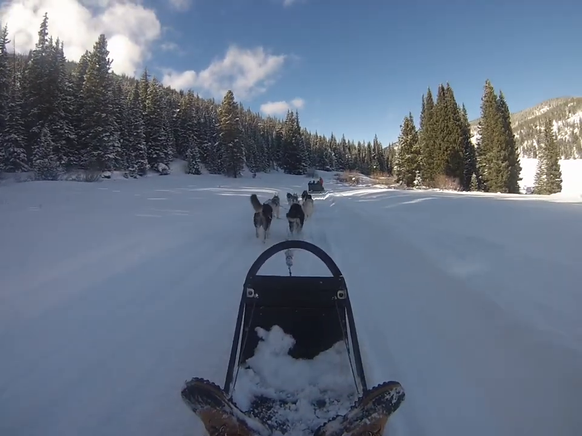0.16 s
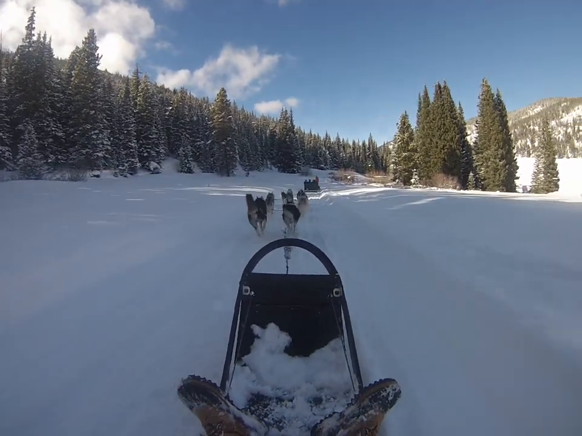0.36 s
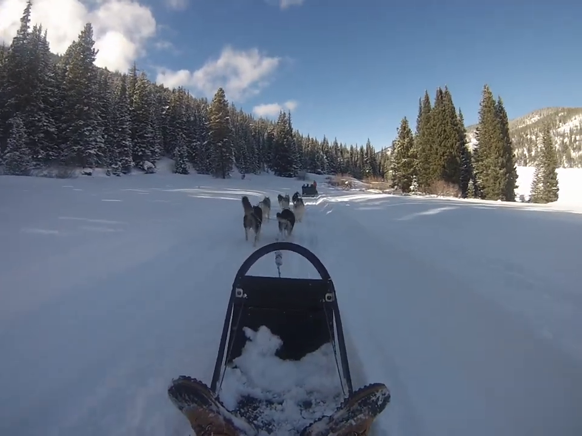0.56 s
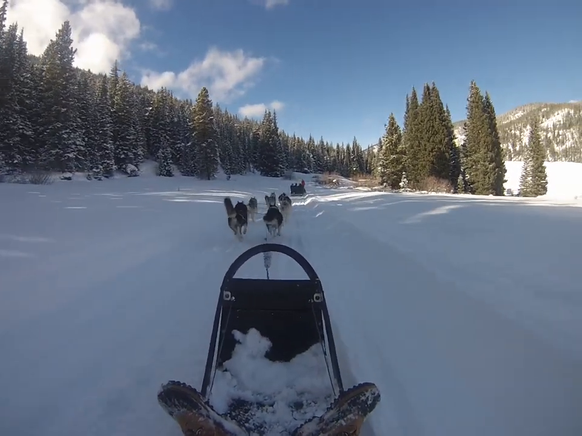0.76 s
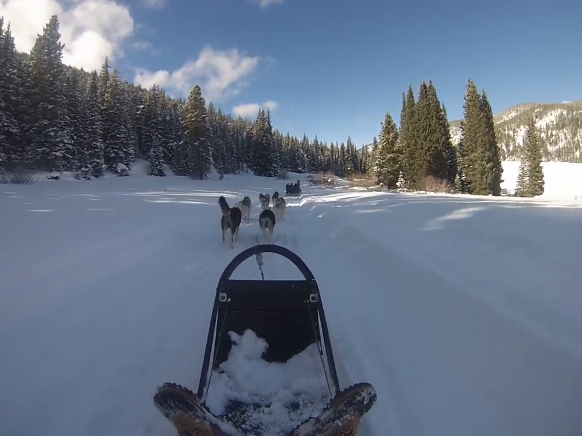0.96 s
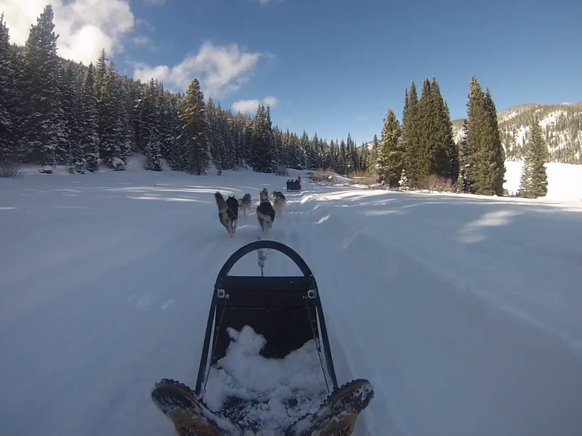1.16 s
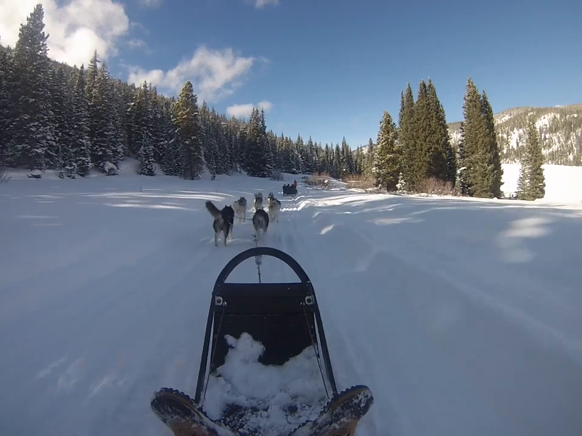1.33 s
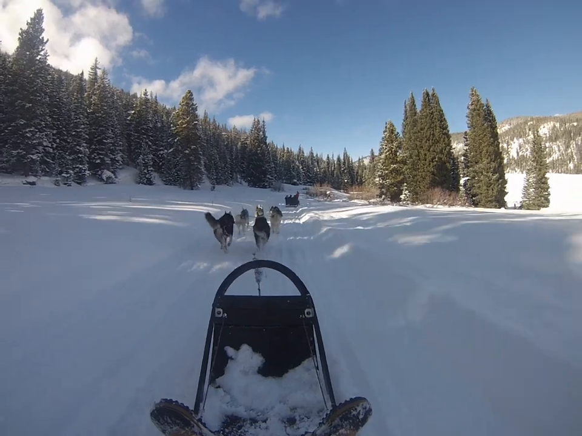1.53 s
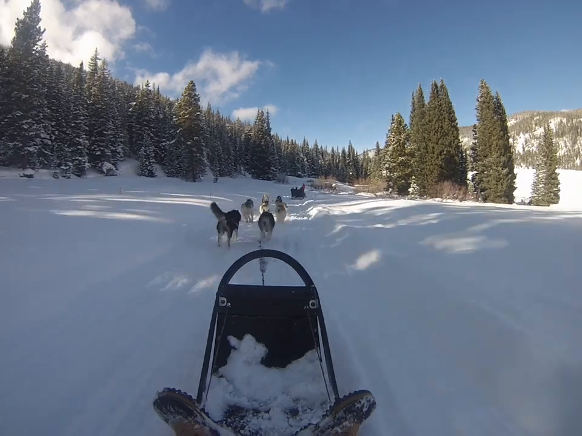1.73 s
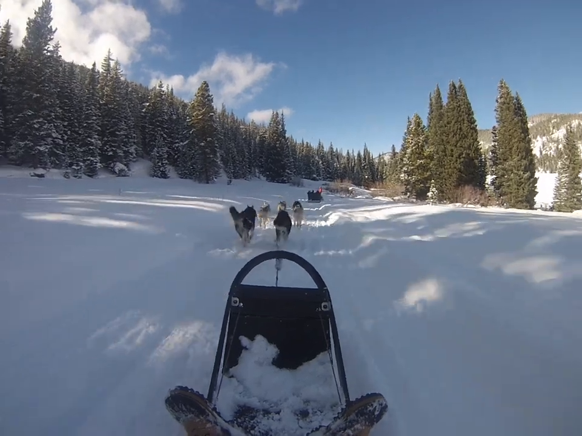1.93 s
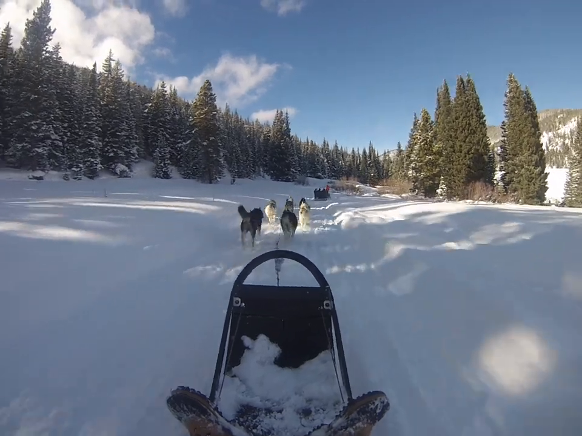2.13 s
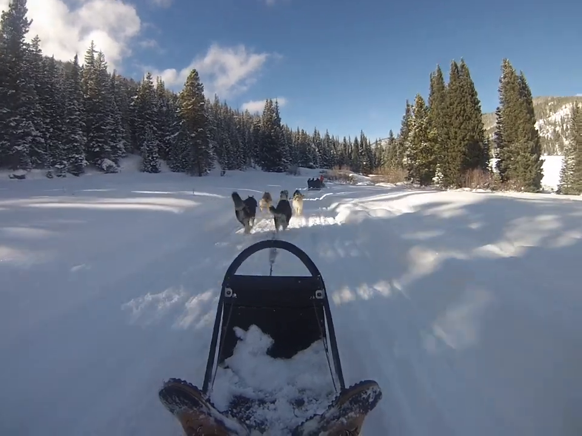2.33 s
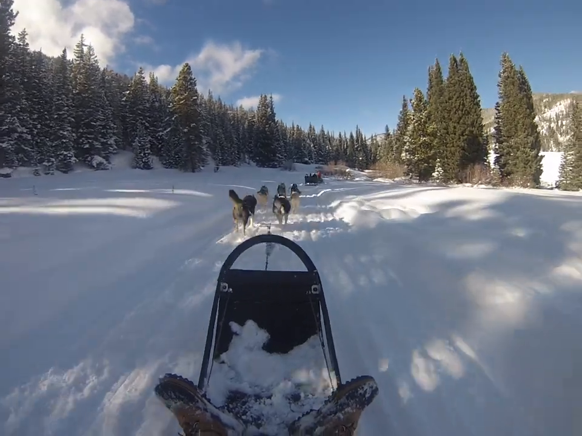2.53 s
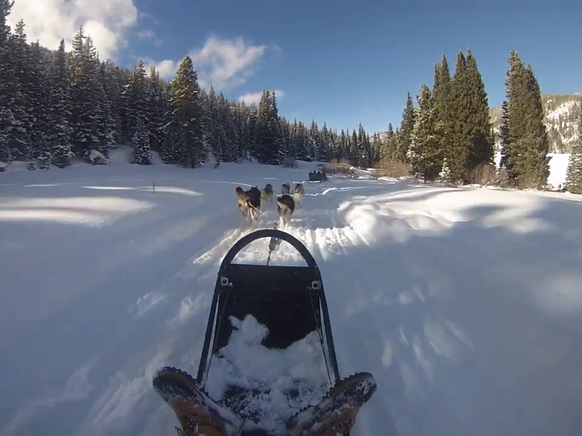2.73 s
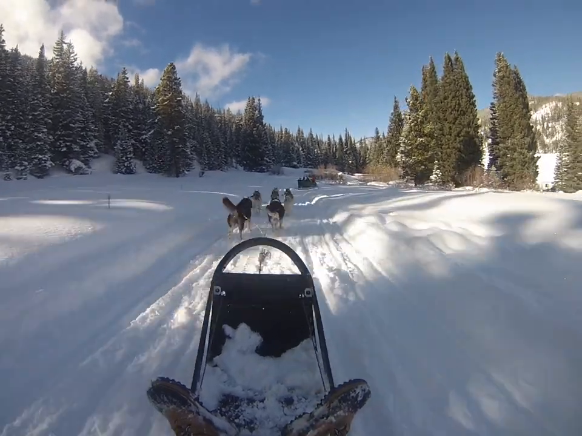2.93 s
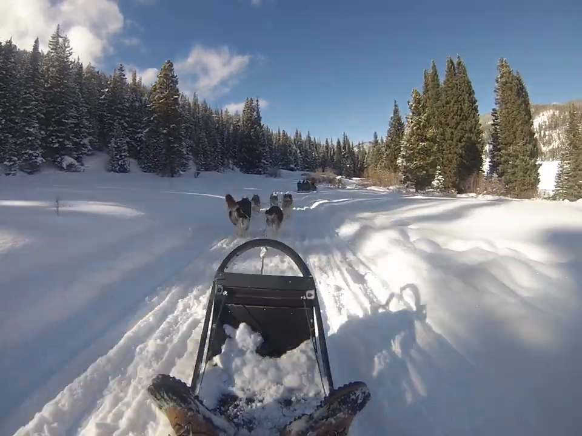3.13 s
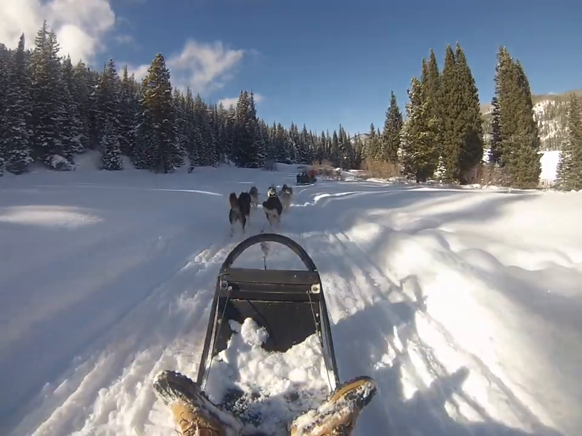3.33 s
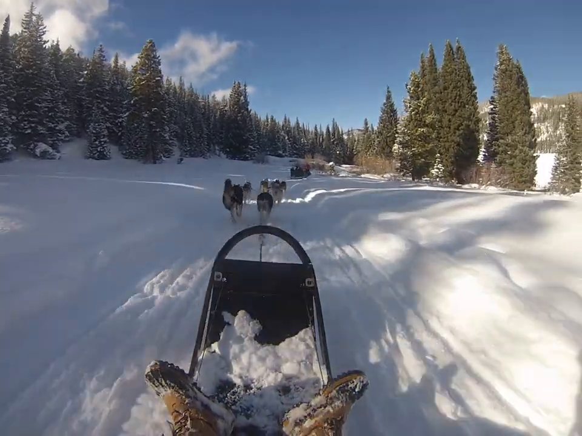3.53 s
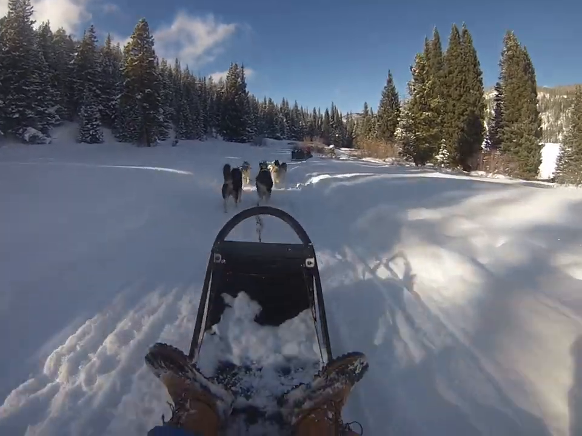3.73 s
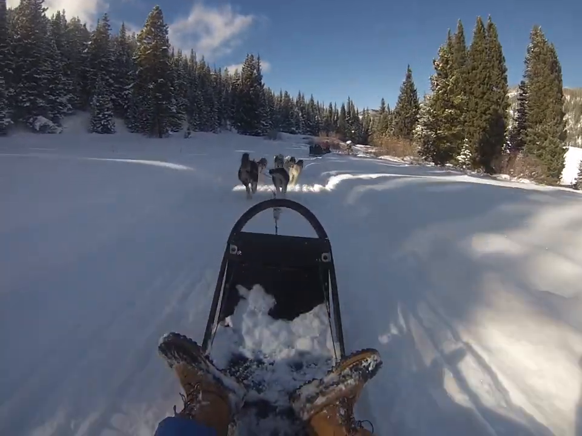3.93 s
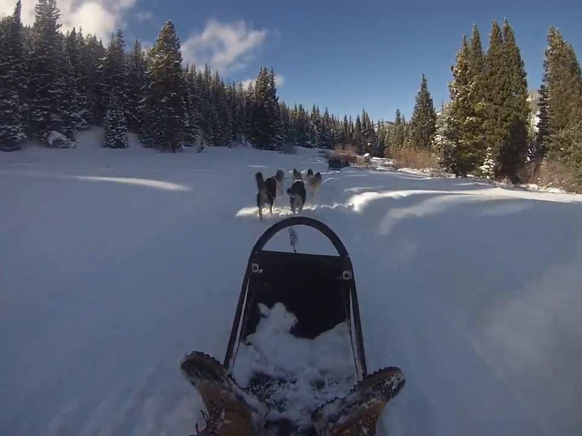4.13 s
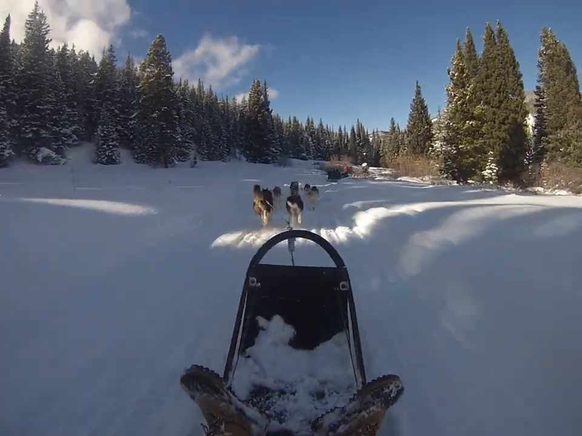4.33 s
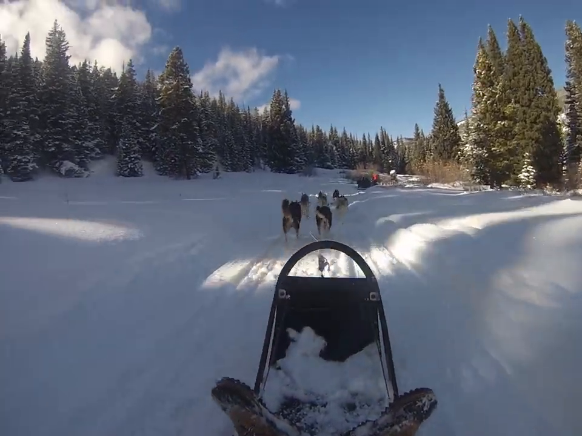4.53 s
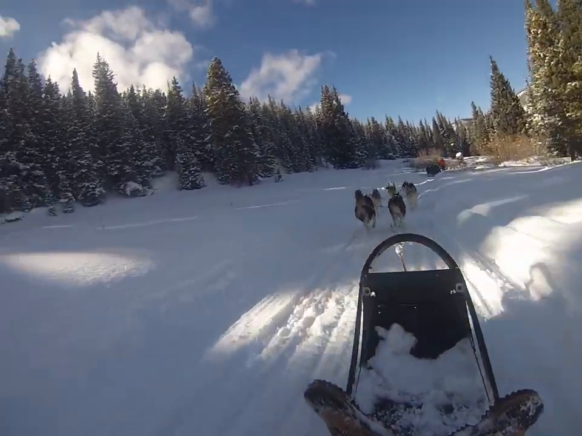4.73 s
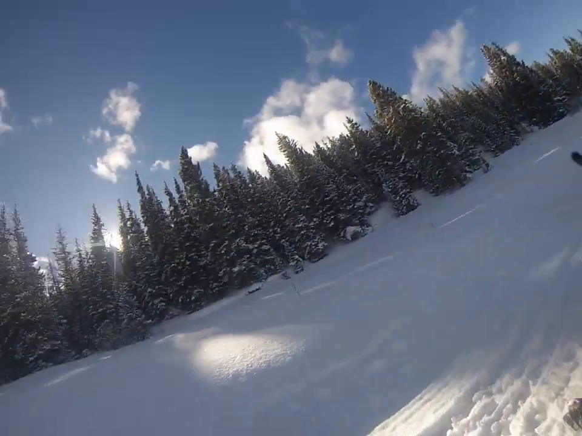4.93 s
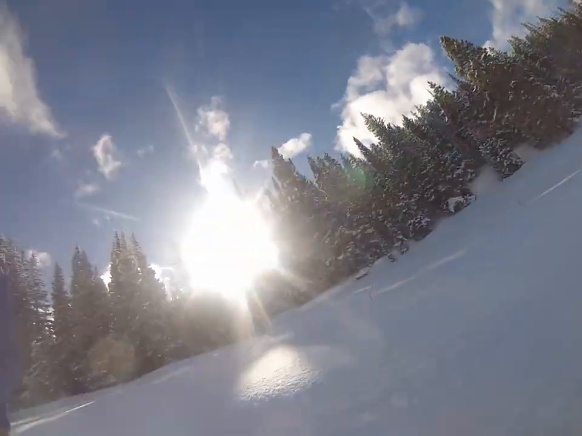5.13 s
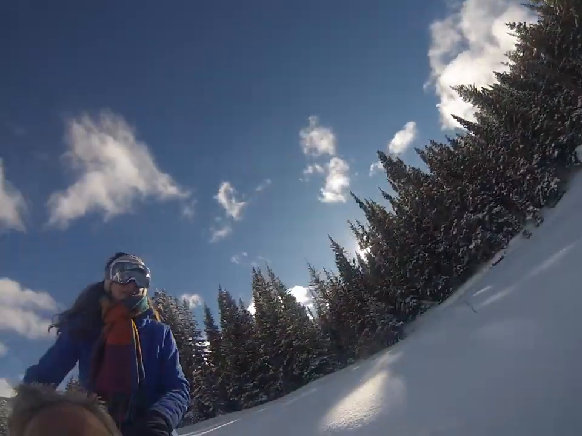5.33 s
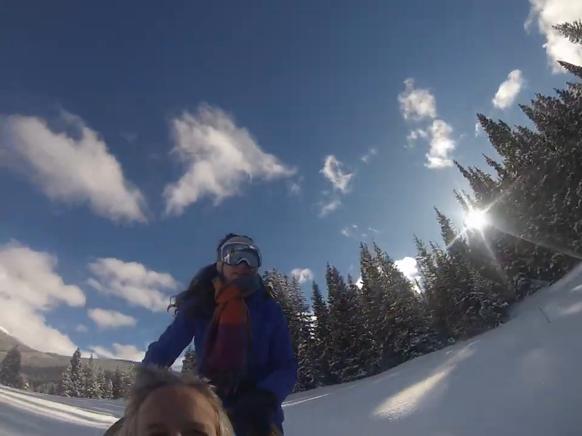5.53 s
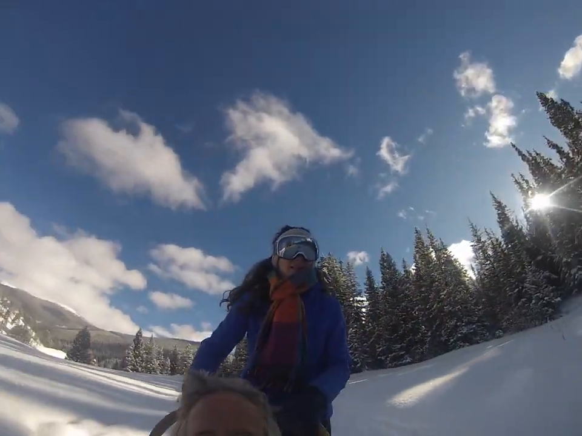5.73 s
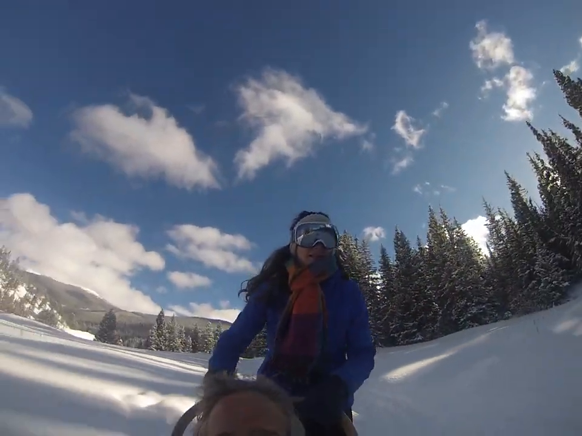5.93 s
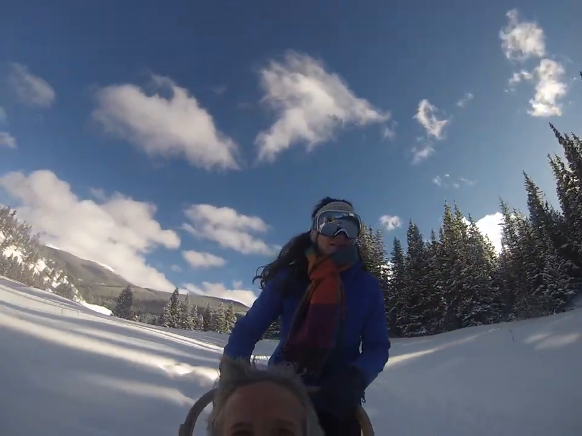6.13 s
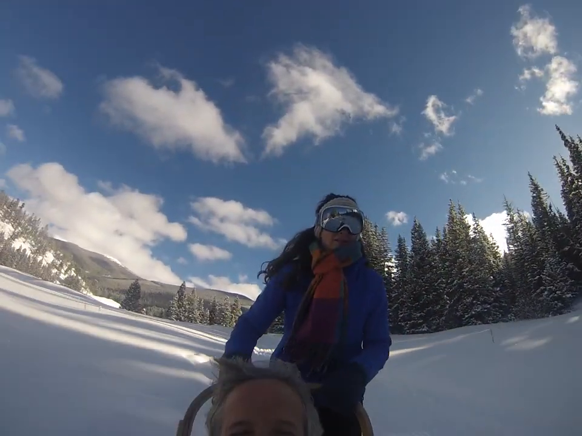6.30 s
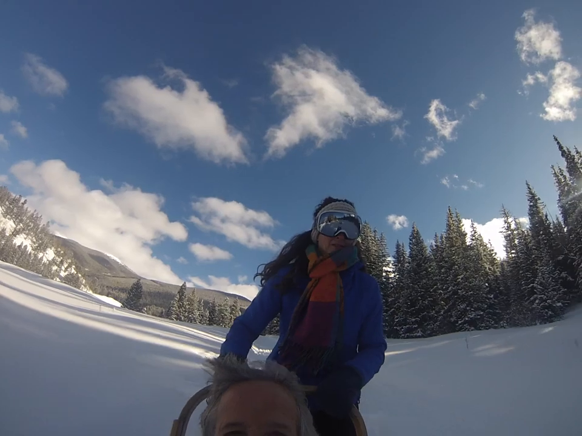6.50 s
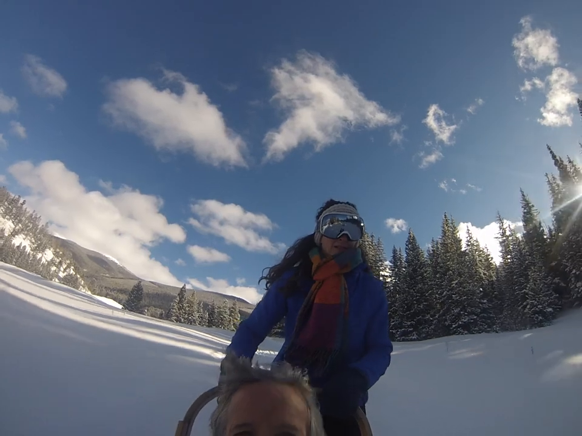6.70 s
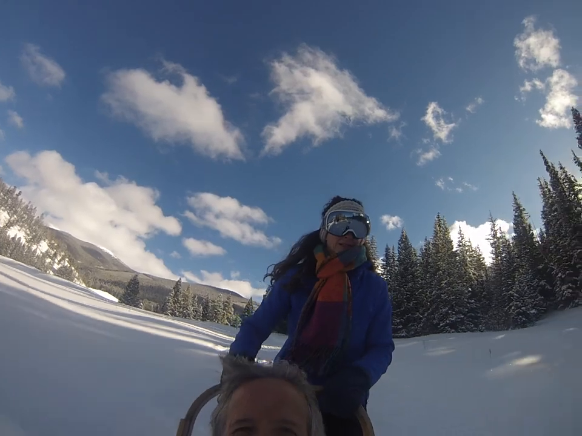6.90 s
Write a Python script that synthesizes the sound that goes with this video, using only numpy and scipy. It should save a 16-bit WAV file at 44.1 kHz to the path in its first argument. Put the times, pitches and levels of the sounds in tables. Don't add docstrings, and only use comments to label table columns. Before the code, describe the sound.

Heard from inside a small sealed camera case on a sled: continuous hollow scrape and low rumble of runners on packed snow, with crunchy lumps, soft thuds and faint ticks. Near five seconds a gloved hand grabs the pole, bringing a heavy low thump, cloth rubbing, sharp knocks and a brief creak around six seconds. Then quieter sliding resumes over a faint electronic hiss.

```python
import sys
import numpy as np
from scipy import signal
from scipy.fft import rfft, irfft
from scipy.io import wavfile
from scipy.ndimage import uniform_filter1d

SR = 44100
rng = np.random.default_rng(int(sys.argv[2]) if len(sys.argv) > 2 else 0)


def level_to_linear(level):
    exponent = np.asarray(level, float) / 20
    return 10 ** exponent


def wrap_up_sound(samples):
    columns = np.atleast_2d(samples).T
    tamed = np.clip(columns, -1, 1)
    steps = np.round(tamed * 32767).astype(np.int16)
    wavfile.write(sys.argv[1], SR, steps)


N = 306936

# time_s, scrape_db, brightness_db
RUNNERS = [(0, -53, -1), (.13, -56.5, 4), (.5, -56.5, 1), (.75, -58, -2.5), (.95, -53, -3),
           (1.3, -55.5, -0.5), (1.55, -57.5, -2), (1.75, -55, 1), (2.1, -56, -0.5), (2.4, -56, -3),
           (2.8, -56, -1), (3.15, -57.5, -1), (3.4, -56, 2), (3.8, -58, 1), (4.6, -56.5, 0),
           (5.85, -57.5, 2.5), (6.1, -60, 0.5), (6.96, -58, -1)]
# time_s, share_done (0-1)
TURN = [
    (4.6, 0.17),
    (4.9, 0.53),
    (5.35, 0.65),
    (5.7, 0.83),
    (6.05, 0.88),
]


def curve(rows):
    s, *columns = np.transpose(rows)
    return [np.interp(np.arange(N) / SR, s, c) for c in columns]


def turned_share():
    return curve(TURN)[0]


def evened(x):
    return x / np.sqrt(np.mean(x ** 2) + 1e-20)


def coloured(x, points):
    f, db = np.transpose(points)
    hz = np.fft.rfftfreq(N, 1 / SR)
    gain_db = np.interp(np.log(hz + 1), np.log(f + 1), db, -120, -120)
    return evened(irfft(rfft(x) * level_to_linear(gain_db), N))


def band(x, lo_hz, hi_hz):
    return evened(signal.sosfilt(signal.butter(3, [lo_hz, hi_hz], "band", fs=SR, output="sos"), x))


def steadied(x, span_s, share):
    power = uniform_filter1d(x ** 2, int(span_s * SR)) + 0.0012
    return evened(x / power ** (share / 2))


def modes(x, table):
    rung = np.zeros(len(x))
    for k, (hz, width, db) in enumerate(table):
        rung += (-1) ** k * level_to_linear(db) * signal.lfilter(*signal.iirpeak(hz, hz / width, SR), x)
    return evened(signal.lfilter(*signal.butter(4, 1.15 * table[-1][0], fs=SR), rung))


def drift(span_s):
    size = int(span_s * SR)
    return evened(uniform_filter1d(uniform_filter1d(rng.standard_normal(N), size), size))


def swell(s, db, half_s):
    t = np.arange(N // 32 + 1) * 32 / SR
    return level_to_linear(np.maximum(db - 5 * ((t - s) / half_s) ** 2, -150))


def swells(rows):
    total = sum(swell(*row[:3]) for row in rows)
    return np.interp(np.arange(N), np.arange(N // 32 + 1) * 32, total)


def struck(peak_db, rise, t60):
    t = np.arange(SR // 2) / SR
    since_peak = np.hypot(np.maximum(t - rise, 0), rise / 2) - rise / 2
    decay = level_to_linear(peak_db - 60 * since_peak / t60)
    return t, decay * np.sin(np.pi / 2 * np.minimum(t / rise, 1)) ** 2


def add(mix, s, sound):
    part = mix[round(s * SR):][:len(sound)]
    part += sound[:len(part)]


def grit(per_s, spread_db, share, lumpy_db):
    size = level_to_linear(spread_db * np.minimum(rng.exponential(1, N), 3)) * np.sign(rng.standard_normal(N))
    clicks = evened(size * (rng.random(N) < per_s / SR))
    fine = rng.standard_normal(N)
    return (share * clicks + fine) * level_to_linear(lumpy_db * drift(0.033))


def pole():
    # centre_s, level_db, half_length_s
    lurches = [(0.11, -38, 0.034), (0.243, -35, 0.06), (0.519, -32, 0.077), (1.011, -44.5, 0.13),
               (1.193, -53, 0.07), (1.429, -40.5, 0.15), (2.085, -31.5, 0.026), (2.294, -40.5, 0.045),
               (2.525, -42.5, 0.16), (2.84, -34.5, 0.1), (3.327, -37, 0.071), (3.687, -46.5, 0.1),
               (3.828, -40.5, 0.087), (4.019, -38.5, 0.057), (4.246, -36.5, 0.058), (4.441, -37.5, 0.029),
               (4.7, -34.5, 0.12), (4.939, -26.5, 0.12), (5.214, -28.5, 0.059), (5.46, -27.5, 0.13),
               (5.703, -31, 0.024), (5.801, -30.5, 0.16), (6.127, -29.5, 0.071), (6.622, -37.5, 0.085),
               (6.95, -36, 0.033)]
    # frequency_hz, level_db (per Hz)
    free_colour = [(3, -59), (6, 12.5), (16, 6.5), (29, 2), (37, -33)]
    held_colour = [(3, -58), (6, 13), (14, 8), (24, -8), (34, -12), (45, -44)]
    # centre_s, level_db, half_length_s
    trail_bumps = [(0.102, -43.5, 0.014), (0.197, -45.5, 0.026), (0.567, -55, 0.039), (0.775, -47.5, 0.026),
                   (0.968, -47, 0.049), (1.074, -44, 0.025), (1.167, -45.5, 0.027), (1.288, -45, 0.016),
                   (1.377, -43.5, 0.028), (1.484, -52, 0.033), (1.692, -47, 0.05), (1.947, -53, 0.023),
                   (2.096, -46.5, 0.023), (2.251, -53, 0.036), (2.408, -47, 0.032), (2.572, -40, 0.028),
                   (2.692, -52, 0.031), (2.779, -43, 0.036), (2.898, -42, 0.032), (3.031, -53, 0.032),
                   (3.124, -52, 0.013), (3.194, -48, 0.023), (3.363, -50, 0.068), (3.58, -41.5, 0.041),
                   (3.675, -46, 0.038), (3.833, -45, 0.035), (3.958, -45.5, 0.035), (4.191, -37.5, 0.02),
                   (4.317, -49, 0.084), (4.52, -55, 0.085)]
    grabs = [(4.618, -43.5, 0.025), (4.696, -38, 0.023), (4.92, -21, 0.039), (5.07, -43, 0.051),
             (5.424, -34, 0.051), (5.66, -33, 0.068), (5.955, -36.5, 0.06), (6.095, -36.5, 0.032),
             (6.308, -44.5, 0.031), (6.415, -48.5, 0.054), (6.5, -49.5, 0.02), (6.704, -44.5, 0.042),
             (6.85, -51.5, 0.024)]
    # start_s, peak_db, rise_s, t60_s
    kicks = [
        (4.889, -16, .025, .07),
    ]
    # start_s, peak_db, pitch_hz, rise_s, t60_s
    jolts = [(4.893, -20, 56, .022, .13), (4.8, -34, 45, .02, .25), (5.174, -16, 37, .006, .22),
             (5.178, -19, 78, .012, .22), (5.375, -23, 27, .01, .2), (6.265, -35, 60, .008, .15),
             (4.19, -35, 60, .008, .15), (4.73, -33, 48, .02, .2), (.085, -37, 42, .01, .15),
             (.545, -33, 38, .01, .2), (.81, -36, 40, .008, .15), (3.98, -34, 42, .012, .2),
             (2.42, -36, 45, .012, .2), (5.1735, -38, 340, .002, .035), (5.719, -41, 340, .003, .05)]
    sway_rest_db, shudder_rest_db, hum_rest_db = -46, -52, -59.5
    shudder_under_bump_db, shudder_top_db, shudder_held_db = -7.5, -48.5, -2
    hum_hz, hum_spread_hz, hum_top_db = 83.9, 2.29, -27

    lurching, held = rng.standard_normal(N), turned_share() ** 2
    sway = (1 - held) * coloured(lurching, free_colour) + held * coloured(lurching, held_colour)
    sway = steadied(sway, 0.19, 0.67)
    shudder = steadied(band(rng.standard_normal(N), 25.8, 71.8), 0.031, 1.0)
    bumps = swells(trail_bumps + grabs)
    shaken = level_to_linear(shudder_rest_db) + np.minimum(level_to_linear(shudder_under_bump_db) * bumps, level_to_linear(shudder_top_db))
    out = np.hypot(level_to_linear(sway_rest_db), swells(lurches)) * sway
    out += shaken * level_to_linear(shudder_held_db * held) * shudder

    hum = np.minimum(np.hypot(level_to_linear(hum_rest_db), bumps), level_to_linear(hum_top_db))
    swing = np.sqrt(2) * hum * level_to_linear(1.5 * drift(0.024))
    for s, *blow in kicks:
        add(swing, s, struck(*blow)[1])
    wander_hz = 3.5 * drift(.012) + hum_spread_hz * drift(.08)
    wander_hz *= np.minimum(.008 / swing, 1)
    turns = np.cumsum(hum_hz + wander_hz) / SR
    out += swing * np.sin(2 * np.pi * (turns - turns[round(kicks[0][0] * SR)]))

    for s, peak_db, hz, rise, t60 in jolts:
        t, envelope = struck(peak_db, rise, t60)
        add(out, s, envelope * np.sin(2 * np.pi * hz * t))
    return out


def housing(x):
    # frequency_hz, width_hz, level_db
    shell_modes = [(1657, 255, -11.5), (1843, 64, 0), (2036, 122, -9), (2381, 69, -4.5), (2591, 89, -8),
                   (2830, 108, -6.5), (3342, 115, -13), (3590, 78, -18.5), (3732, 88, -16),
                   (4700, 290, -22.5)]
    # frequency_hz, width_hz, depth (0-1)
    hollows = [(1952, 33, 0.6), (2500, 57, 0.5), (3090, 200, .4), (3480, 76, 0.2)]
    rung = modes(x, shell_modes)
    for hz, width, depth in hollows:
        rung = rung - depth * signal.lfilter(*signal.iirpeak(hz, hz / width, SR), rung)
    return evened(rung)


def runners():
    # frequency_hz, level_db (per Hz)
    rumble_colour = [(62, -18), (105, 0.5), (113, -5.5), (162, -8), (199, -2.5), (274, -13), (313, -7.5),
                     (397, -13), (438, -11.5), (560, -24), (730, -52), (1230, -120)]
    # frequency_hz, width_hz, level_db
    crunch_modes = [(696, 127, -0.5), (991, 86, 2.5), (1278, 290, -2.5), (1640, 230, -13.5)]
    # frequency_hz, width_hz, level_db
    turned_modes = [(1572, 58, -1.5), (1755, 148, 4.5), (1900, 242, 3), (2140, 440, -4), (2770, 390, -17.5),
                    (2960, 75, -17), (3590, 280, -14), (4270, 380, -18), (5040, 470, -20)]
    # centre_s, rumble_db, half_length_s
    rut_rows = [(.05, -55.5, 0.041), (.8, -53, 0.085), (1.12, -57.5, 0.11), (1.38, -54, 0.078),
                (2.23, -56, 0.025), (2.95, -58, 0.046), (2.52, -61, 0.054), (3.55, -64.5, 0.1),
                (3.3, -56, 0.062), (4.61, -55.5, 0.1), (4.8, -56.5, 0.063), (5.31, -52, 0.02),
                (5.63, -54.5, 0.031), (5.99, -51.5, 0.092), (6.42, -73, 0.092)]
    # centre_s, ring_db, half_length_s, crunch_above_ring_db
    scuff_rows = [
        (4.79, -53.5, 0.13, -4.5),
        (5.224, -54.5, 0.03, -7),
        (5.035, -62, 0.072, 0.5),
        (5.296, -49, 0.019, -11),
        (5.408, -53.5, 0.016, 2.5),
        (5.466, -56, .09, 0.5),
        (5.666, -52, 0.011, 4),
        (5.686, -55.5, 0.062, 1),
        (5.824, -59.5, 0.051, 1),
        (6, -57.5, 0.039, -4),
    ]
    rumble_db, rumble_follows, crunch_db, crunch_follows = -55.5, 0.59, -62, 0.79
    rut_crunch_db, bright_from_hz = -8, 2850

    scrape_db, bright_db = curve(RUNNERS)
    ruts, scuffs = swells(rut_rows), swells(scuff_rows)
    grating = swells([(s, db + above_db, half_s) for s, db, half_s, above_db in scuff_rows])
    press_db = scrape_db - scrape_db.mean()
    contact, turned = grit(350, 6.3, 0.38, 2.06), turned_share()
    rumble = coloured(contact + 1.48 * grit(60, 7.0, 0.36, 1.0), rumble_colour)
    crunch = modes(contact + 1.9 * grit(150, 2.3, 0.53, 1.67), crunch_modes)

    shaking = contact + grit(200, 8.3, 0.81, 0.7)
    ring = np.sqrt(1 - turned) * housing(shaking) + np.sqrt(turned) * modes(shaking[::-1], turned_modes)
    upper = signal.sosfiltfilt(signal.butter(2, bright_from_hz, "high", fs=SR, output="sos"), ring)
    ring = ring + (level_to_linear(bright_db) - 1) * upper

    rumble_gain = np.hypot(level_to_linear(rumble_db + rumble_follows * press_db), ruts)
    crunch_gain = np.hypot(level_to_linear(crunch_db + crunch_follows * press_db), level_to_linear(rut_crunch_db) * ruts + grating)
    return np.hypot(level_to_linear(scrape_db), scuffs) * ring + rumble_gain * rumble + crunch_gain * crunch


def whistle():
    pitch_hz, width_hz, wander_hz, level_db, patchy_db = 1850, 39, 15.4, -7.5, 2.5
    scrape_db, _ = curve(RUNNERS)
    turn = np.exp(2j * np.pi * np.cumsum(pitch_hz + wander_hz * drift(0.054)) / SR)
    r = np.exp(-np.pi * width_hz / SR)
    slow = rng.standard_normal(N) / turn
    for _ in range(2):
        slow = signal.lfilter([1], [1, -r], slow)
    gain = level_to_linear(scrape_db + level_db + patchy_db * drift(0.049))
    return gain * (1 - turned_share()) * evened((turn * slow).real)


def circuits():
    # frequency_hz, level_db (per Hz)
    hiss_colour = [(2240, -28), (3800, -5.5), (4100, -10.5), (4720, -0.5), (5430, -6), (5990, -3),
                   (7000, -5), (7800, -3.5), (8460, -7.5), (10000, -1.5), (10700, -6), (14000, -6.5),
                   (14700, -12), (15400, -14)]
    # low_hz, high_hz
    chirp_hz = [(9250, 10450), (12600, 14600), (11000, 11700)]
    # from_s, to_s
    busy_rows = [
        [(.017, .031), (.052, .055), (.06, .063), (.078, .098)],
        [(.015, .02), (.032, .037), (.047, .064), (.069, .077), (.097, .1)],
        [(.069, .08), (.097, .1)],
    ]
    idle_rows = [
        [(0, .012), (.033, .047), (.064, .069)],
        [(.032, .036), (.05, .056)],
        [(0, .01), (.063, .07)],
    ]
    # busy_db, idle_db
    chirp_db = [(-69.5, -69.5), (-71.5, -91), (-72, -74.5)]
    hiss_db, cycle_s, busy_from_s = -68.5, .1001, .4

    t = np.arange(N) / SR
    out = level_to_linear(hiss_db + 1.4 * drift(0.006)) * coloured(rng.standard_normal(N), hiss_colour)
    within = (t + 0.0044 * drift(0.094)) % cycle_s
    busy = (t - busy_from_s) % (20 * cycle_s) < 10 * cycle_s
    for edges, busy_slots, idle_slots, (busy_db, idle_db) in zip(chirp_hz, busy_rows, idle_rows, chirp_db):
        on_busy = sum((within > a) * (within < b) for a, b in busy_slots)
        on_idle = sum((within > a) * (within < b) for a, b in idle_slots)
        gate = uniform_filter1d(np.where(busy, level_to_linear(busy_db) * on_busy, level_to_linear(idle_db) * on_idle), size=30)
        out += gate * level_to_linear(2.0 * drift(0.0028) + 1.9 * drift(.04)) * band(rng.standard_normal(N), *edges)
    return out


def lumps():
    # start_s, peak_db
    strikes = [(0.0194, -47), (0.0539, -35), (0.257, -38), (0.3321, -43), (0.411, -41), (0.4514, -49),
               (0.5407, -44), (0.8719, -45), (0.8985, -45), (0.938, -41), (0.989, -49), (1.0236, -44),
               (1.1493, -47), (1.1952, -47), (1.2645, -44), (1.282, -42), (1.509, -40), (1.654, -39),
               (1.721, -44), (1.7419, -39), (1.773, -39), (1.8133, -53), (1.9723, -43), (2.0502, -50),
               (2.2727, -49), (2.3238, -47), (2.6449, -45), (2.719, -34.5), (2.754, -35.5), (3.061, -42),
               (3.1018, -47), (3.133, -53), (3.1524, -53), (3.3115, -37), (3.349, -38), (3.409, -45),
               (3.715, -52), (4.118, -49), (4.3071, -44), (4.367, -56), (4.4019, -40), (4.4258, -40),
               (4.6089, -48), (4.6633, -49)]
    # frequency_hz, width_hz, level_db
    lump_modes = [(1670, 230, -13), (1850, 44, -3), (2350, 80, -11), (2790, 110, -15), (3340, 120, -19)]
    crush_s, level_db = 0.004, -6
    (s, db), hits = np.transpose(strikes), np.zeros(N)
    hits[(s * SR).astype(int)] = level_to_linear(db)
    crush = signal.oaconvolve(hits, np.exp(-np.arange(441) / SR / crush_s))[:N]
    rung = modes(crush * np.sign(rng.standard_normal(N)), lump_modes)
    return level_to_linear(level_db + db.max()) * rung / abs(rung).max()


def thuds():
    # start_s, peak_db, pitch_hz
    dips = [
        (0.053, -47, 207),
        (0.814, -45.5, 196),
        (1.333, -44, 210),
        (1.442, -47, 152),
        (2.23, -46.5, 206),
        (2.949, -42.5, 129),
        (3.654, -46, 202),
        (3.754, -52, 184),
        (3.916, -46.5, 197),
        (4.389, -46, 221),
    ]
    level_db, rise_s, t60_s = -5, 0.0073, 0.17
    out = np.zeros(N)
    for s, db, hz in dips:
        t, envelope = struck(db + level_db, rise_s, t60_s)
        add(out, s, envelope * np.sin(2 * np.pi * hz * t))
    return out


def high_ticks():
    # start_s, peak_db
    ticks = [(.7447, -62), (.76, -57), (0.7804, -58.5), (.948, -59), (1.0398, -61), (1.2434, -62),
             (1.2855, -64), (1.7737, -60), (1.8934, -60), (1.9084, -61), (2.218, -59), (1.1017, -61),
             (1.2034, -59), (1.273, -62), (1.3783, -58), (1.501, -58), (1.6093, -60), (1.7065, -56),
             (1.8772, -58), (1.9764, -61), (2.102, -63), (2.2021, -59), (5.3832, -55), (5.6326, -63),
             (5.9813, -62), (6.0407, -62), (6.1469, -60), (6.2158, -62), (6.252, -61), (6.2784, -56),
             (6.621, -73), (6.7122, -58), (6.7768, -59), (6.8816, -57), (6.9396, -59)]
    pitch_hz, rise_s, t60_s = 6050, 0.00081, .024
    out, t = np.zeros(N), np.arange(2205) / SR
    for (s, db), detune in zip(ticks, rng.uniform(0.96, 1.02, len(ticks))):
        envelope = level_to_linear(db - 60 * t / t60_s) * np.minimum(t / rise_s, 1)
        add(out, s, envelope * np.sin(2 * np.pi * pitch_hz * detune * t))
    return out


def knocks():
    # start_s, peak_db, pitch_hz, length_s
    blows = [(0.751, -44, 1000, 0.011), (1.354, -42, 980, 0.0081), (1.652, -36.5, 1850, 0.007),
             (1.748, -47, 1640, .006), (2.231, -46, 984, 0.017), (2.83, -45, 1270, 0.0079),
             (4.307, -38.5, 1680, 0.0028), (4.658, -51, 3300, .0031), (4.723, -49, 2100, .0071),
             (4.915, -30.5, 960, 0.0033), (4.9156, -40, 1900, .003), (5.176, -34.5, 1260, 0.006),
             (5.295, -48, 1900, 0.021), (5.404, -31.5, 1700, 0.004), (5.412, -37, 1010, .0073),
             (5.648, -35, 1100, 0.0033), (5.653, -34, 740, .004), (5.663, -37, 1890, 0.007),
             (5.666, -32.5, 950, 0.0079), (5.67, -40, 1300, 0.0044), (5.719, -42, 980, 0.0063),
             (5.9814, -32, 960, 0.0042), (5.982, -50, 1500, 0.0036), (5.9825, -36, 740, 0.007),
             (5.926, -37.5, 720, .006), (5.916, -45, 993, 0.0037), (6.112, -43, 940, 0.0066),
             (6.28, -45, 1705, 0.0089), (6.354, -40.5, 736, 0.0059), (6.573, -42, 1730, 0.0053),
             (6.881, -34.5, 920, 0.0053), (5.177, -37, 2520, 0.004), (5.1735, -31, 680, 0.0033),
             (5.178, -43, 1810, 0.0031), (4.839, -40, 940, 0.0035), (4.842, -37, 1820, .003),
             (4.982, -42, 991, 0.0046), (5.158, -48, 1860, .008), (5.386, -39, 2050, .005),
             (5.403, -39, 1360, .005), (5.495, -37, 960, 0.0053), (5.766, -44, 1870, .005)]
    shell_from_hz = 1400
    out, t = np.zeros(N), np.arange(4410) / SR
    for s, db, hz, length in blows:
        noise = rng.standard_normal(4410)
        thud_db, crack = (-14.5, 0.43) if hz > shell_from_hz else (-14.5, 0.55)
        fade = np.minimum(t / .0005, 1) * np.exp(-t / length)
        ring = (1 - crack) * np.sin(2 * np.pi * hz * t) + .5 * crack * band(noise, 830, 2130)
        thud = band(fade * noise[::-1], 204, 506)
        add(out, s, level_to_linear(db) * (fade * ring + level_to_linear(thud_db) * thud / abs(thud).max()))
    return out


def squeals():
    # centre_s, level_db, half_length_s, pitch_hz, glide_hz_per_s
    tones = [(2.1, -62, 0.16, 2097, -11), (2.164, -65, 0.092, 1800, -250), (5.985, -52.5, .035, 715, -500),
             (6.024, -53.5, 0.0126, 640, -4500), (5.983, -50.5, .022, 285, -500),
             (6.655, -60.5, 0.0213, 345, 102), (6.0, -55, 0.024, 2110, 301), (6.04, -56, .014, 1800, -300),
             (5.995, -58, 0.018, 2700, -1), (6.04, -60, .015, 1850, -300), (5.93, -58, 0.02, 1260, -700),
             (6.01, -47.5, .03, 170, 201.5), (5.945, -51, 0.0199, 165, 300),
             (6.03, -57.5, 0.0251, 2160, -200), (5.97, -57, 0.0253, 1190, 299),
             (6.035, -52, 0.0179, 310, 296), (6.01, -56.5, .02, 1000, -900), (6.0, -60, 0.029, 1100, -800),
             (5.225, -58.5, .022, 2000, -0.5)]
    out, t = np.zeros(N), np.arange(-SR // 2, SR // 2) / SR
    waver, unsteady = 1 + 0.0148 * drift(0.0042), level_to_linear(2.7 * drift(0.006))
    for (s, db, half_s, hz, glide), at in zip(tones, rng.integers(0, N - SR, len(tones))):
        pitch = (hz + glide * np.clip(t, -2 * half_s, 2 * half_s)) * waver[at:at + SR]
        gain = level_to_linear(np.maximum(db - 5 * (t / half_s) ** 2, -150)) * unsteady[at:at + SR]
        add(out, s + t[0], np.sqrt(2) * gain * np.sin(2 * np.pi * np.cumsum(pitch) / SR))
    return out


def snaps():
    # start_s, peak_db
    flicks = [
        (4.664, -54),
        (5.384, -42),
        (5.72, -51.5),
        (5.983, -48),
        (6.041, -48),
    ]
    snap_s = 0.0016
    (s, db), hits = np.transpose(flicks), np.zeros(N)
    hits[(s * SR).astype(int)] = level_to_linear(db)
    burst = signal.oaconvolve(hits, np.exp(-np.arange(441) / SR / snap_s))[:N]
    return .5 * burst * band(rng.standard_normal(N), 3000, 9200)


def stroke(start, length, from_db, to_db):
    rise_s, fall_s = 0.018, 0.035
    t = np.arange(N) / SR - start
    ends = np.clip(t / rise_s, 0, 1) * np.clip((length + fall_s - t) / fall_s, 0, 1)
    return ends * level_to_linear(np.interp(t, [0, length], [from_db, to_db]))


def patchy(x):
    split_hz = [4600, 6200]
    low, upto = (signal.sosfiltfilt(signal.butter(2, hz, fs=SR, output="sos"), x) for hz in split_hz)
    return sum(part * level_to_linear(2.2 * drift(0.032)) for part in (low, upto - low, x - upto))


def glove():
    # start_s, length_s, start_db, end_db
    strokes = [
        (4.684, .05, -77, -64),
        (4.725, 0.12, -58, -58),
        (4.848, .08, -54, -57),
        (4.93, 0.17, -62, -65),
        (5.052, 0.143, -58.5, -56.5),
        (5.177, 0.15, -57, -57.5),
        (5.371, 0.24, -55.5, -66.5),
        (5.595, 0.083, -63, -58.5),
        (5.68, 0.13, -64, -64),
        (5.82, 0.17, -75, -72),
    ]
    # frequency_hz, level_db (per Hz)
    rub_colour = [(1880, -42), (3200, -13), (3560, 0), (3870, -5), (4210, 4.5), (4800, -1.5), (5220, 8),
                  (5600, 0), (6250, -6), (7350, 4), (7610, 0), (8640, -13), (10300, -7), (13400, -46),
                  (22000, -120)]
    # centre_s, level_db, half_length_s
    fizz_rows = [
        (4.89, -76, .04),
        (5.25, -65, 0.061),
        (5.46, -67, 0.043),
    ]
    # centre_s, groan_db, half_length_s
    groan_rows = [
        (5.31, -45, 0.052),
        (5.62, -40, 0.032),
        (5.72, -49, 0.02),
        (5.93, -44.5, 0.043),
        (6.005, -40.5, 0.028),
    ]
    # centre_s, creak_db, half_length_s
    creak_rows = [
        (5.925, -52, 0.018),
        (5.99, -50, 0.016),
        (6.04, -53, 0.019),
    ]
    # frequency_hz, width_hz, level_db
    joint_modes = [(304, 43, 8.5), (362, 24.3, 7), (723, 30, 1), (920, 40, -1.5), (1155, 39, 4),
                   (1270, 49, -2), (1890, 76, 3), (2130, 76, 2), (2140, 35, 6)]

    press = np.max([stroke(*row) for row in strokes], axis=0)
    cloth = grit(890, 3.5, 0.61, 1.0) * level_to_linear(0.93 * drift(0.03))
    fizz = level_to_linear(-16) * press + swells(fizz_rows)
    rub = press * patchy(coloured(cloth, rub_colour)) + fizz * band(cloth, 10400, 12030)
    groan = swells(groan_rows) * steadied(band(rng.standard_normal(N), 90.0, 144.0), 0.016, 0.19)
    slip_rate_hz = 105 * level_to_linear(3.3 * drift(0.009))
    slips = np.diff(np.floor(np.cumsum(slip_rate_hz) / SR), prepend=0)
    creak = steadied(modes(evened(slips) + 0.25 * rng.standard_normal(N), joint_modes), 0.051, 0.97)
    return rub + groan + swells(creak_rows) * creak


def held_frame():
    # frequency_hz, width_hz, level_db
    held_modes = [(194.1, 30, 1), (328, 27, 1), (478, 30, -2.5), (740, 41, -2), (981, 39, -2.5),
                  (1300, 76, -13)]
    # centre_s, level_db, half_length_s
    surges = [
        (6.14, -60, 0.034),
        (6.33, -59, 0.036),
        (6.46, -59.5, 0.044),
        (6.58, -58, 0.062),
        (6.68, -64, 0.02),
        (6.8, -68, 0.034),
        (6.94, -58, 0.02),
    ]
    return swells(surges) * modes(grit(200, 4, .4, 1.5), held_modes)


def scene():
    trail = pole() + runners() + whistle() + lumps() + thuds() + squeals()
    camera = circuits() + high_ticks() + knocks()
    hand = snaps() + glove() + held_frame()
    return (trail + camera + hand)[None]


def band_limit(x):
    return signal.sosfilt(signal.butter(12, 15490, fs=SR, output="sos"), x)


def record(dry):
    # centre_s, half_length_s
    losses = [
        (4.21, .04),
        (6.13, .035),
        (5.7, .012),
    ]
    edge_hz, loss_from_hz = 15290, 14600
    low_pass = signal.firwin(1001, edge_hz, window=("kaiser", 9), fs=SR)
    limited = signal.oaconvolve(dry, low_pass[None], "same")
    top = signal.sosfiltfilt(signal.butter(8, loss_from_hz, "high", fs=SR, output="sos"), limited)
    limited = limited - top * np.minimum(swells([(s, 5, half_s) for s, half_s in losses]), 1)
    return band_limit(limited)


dry = scene()
out = record(dry)
wrap_up_sound(out)
```